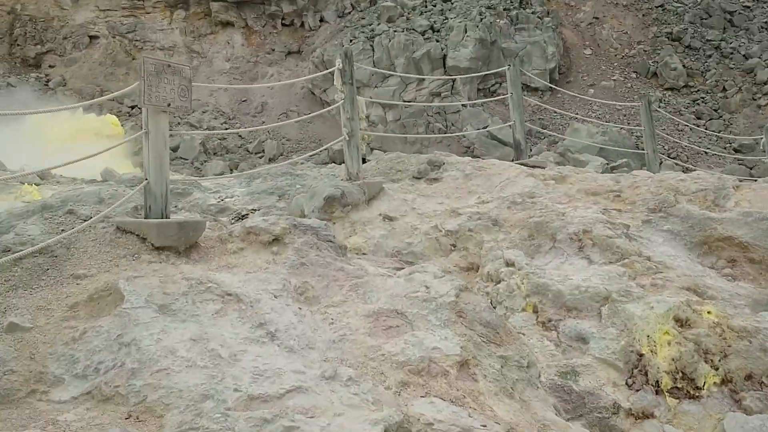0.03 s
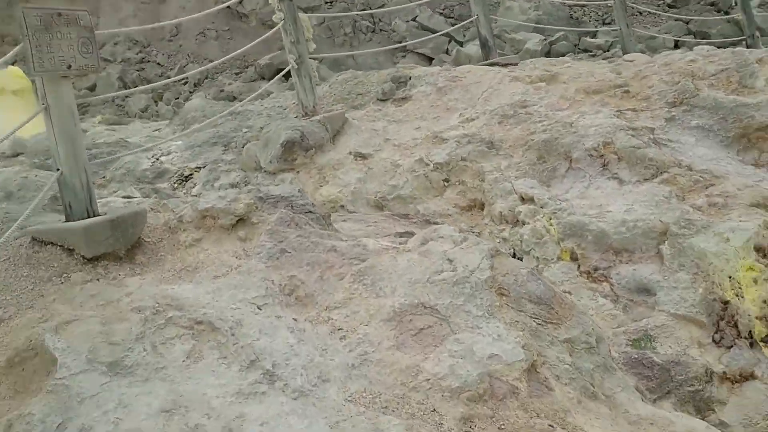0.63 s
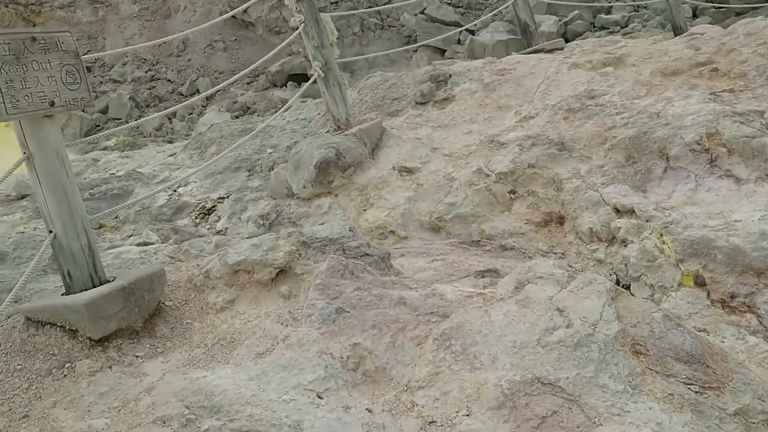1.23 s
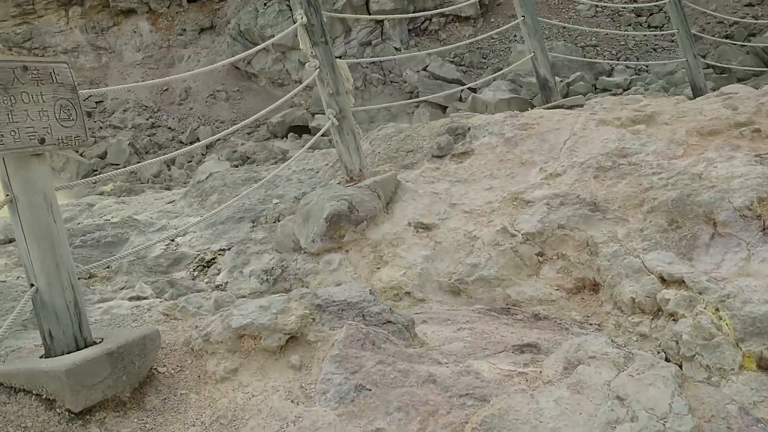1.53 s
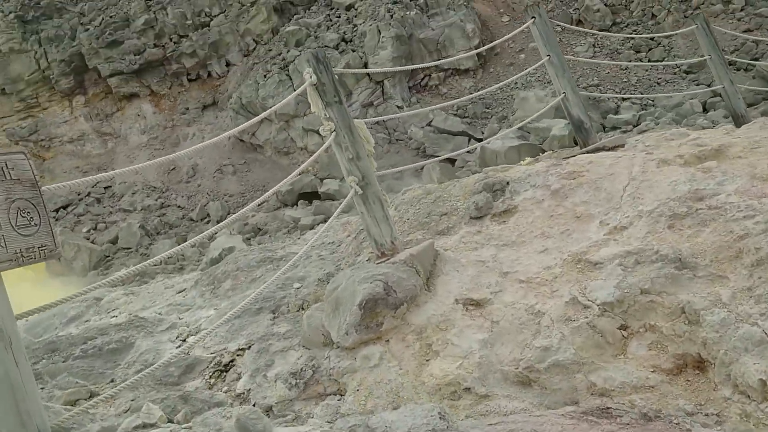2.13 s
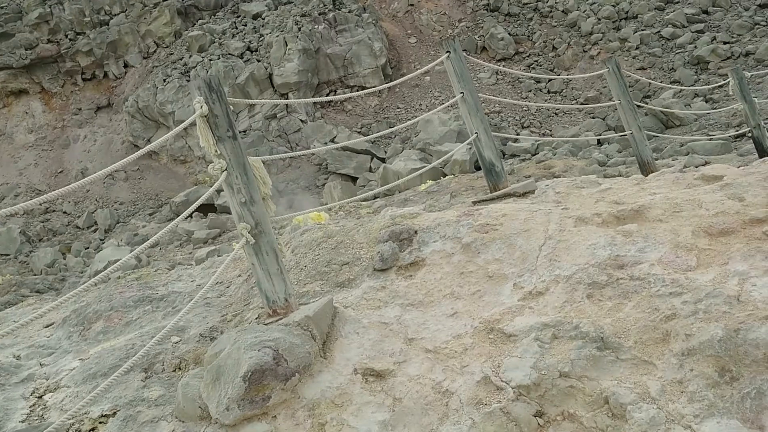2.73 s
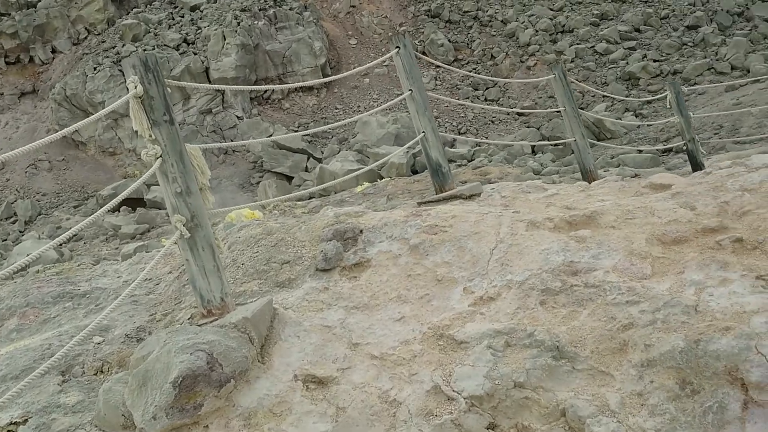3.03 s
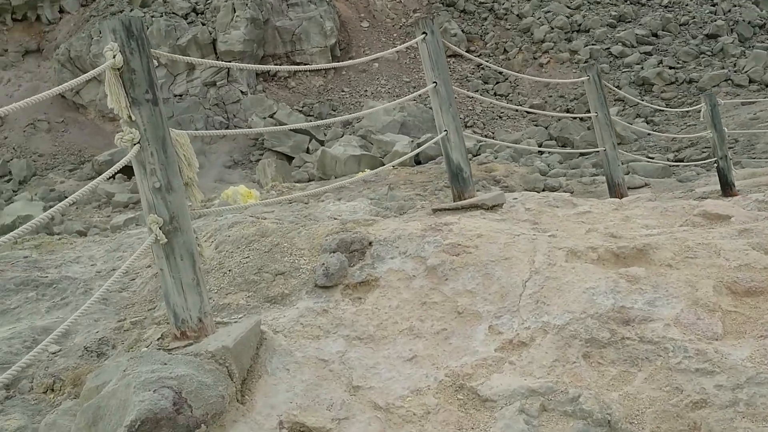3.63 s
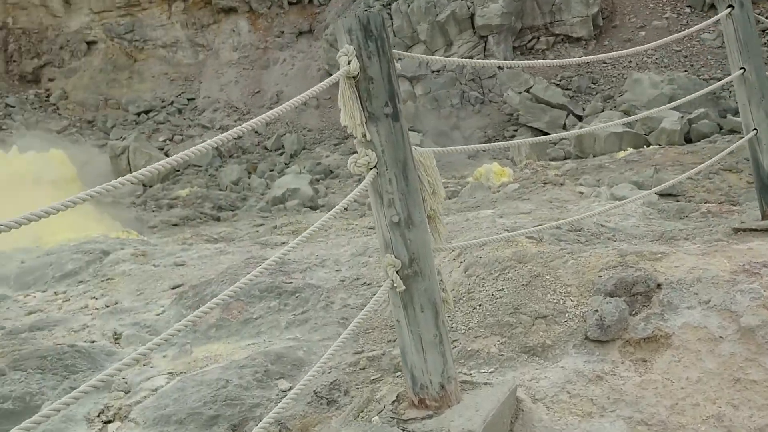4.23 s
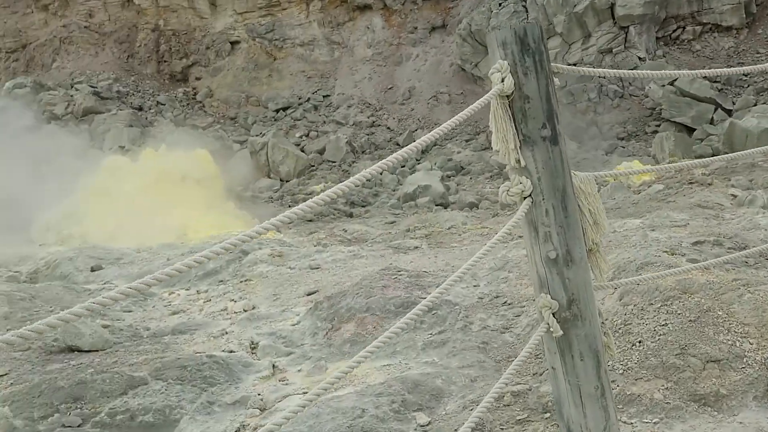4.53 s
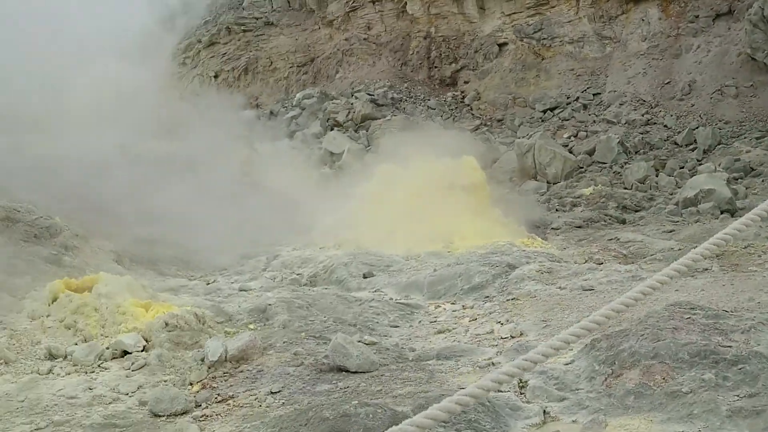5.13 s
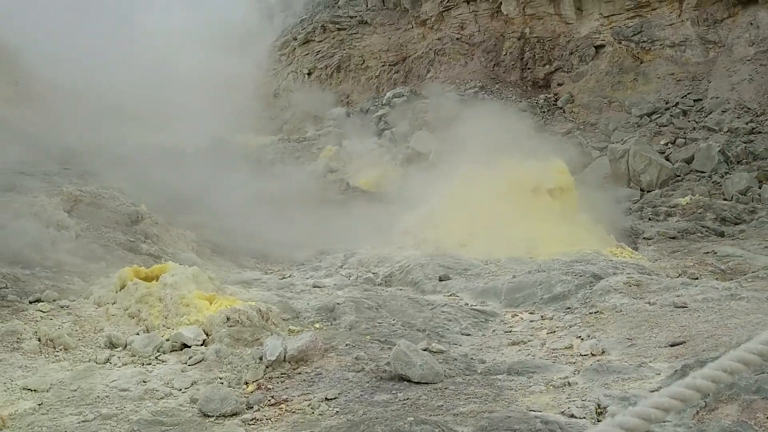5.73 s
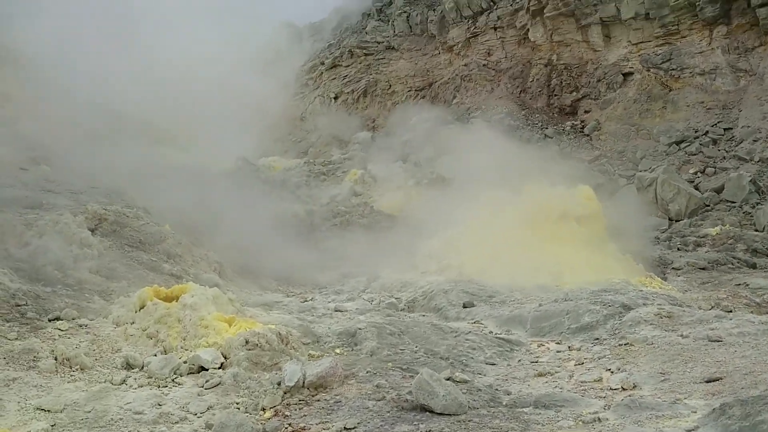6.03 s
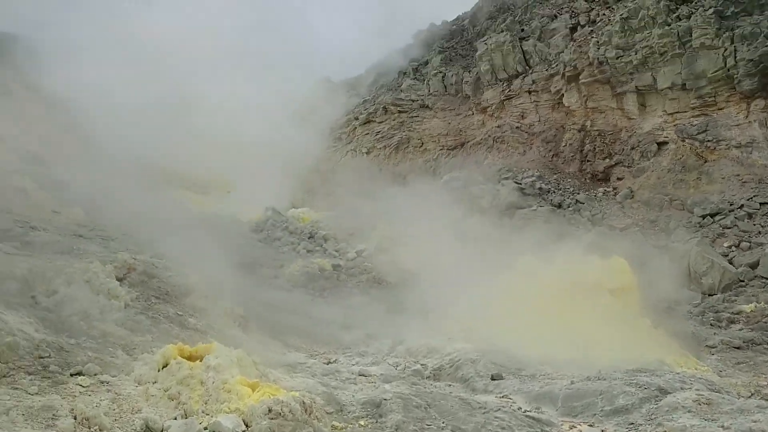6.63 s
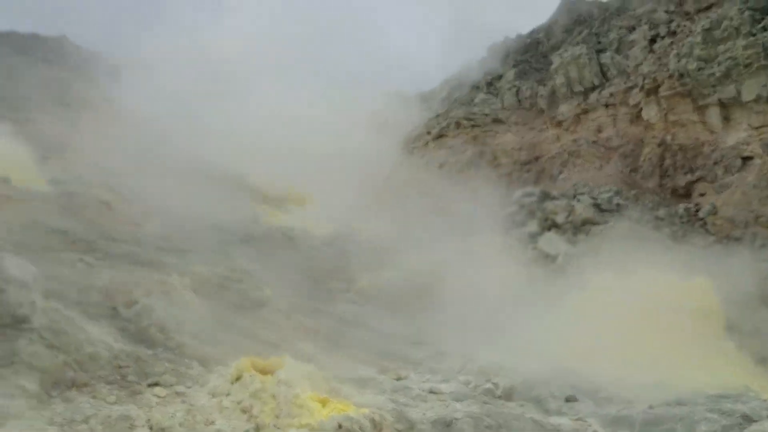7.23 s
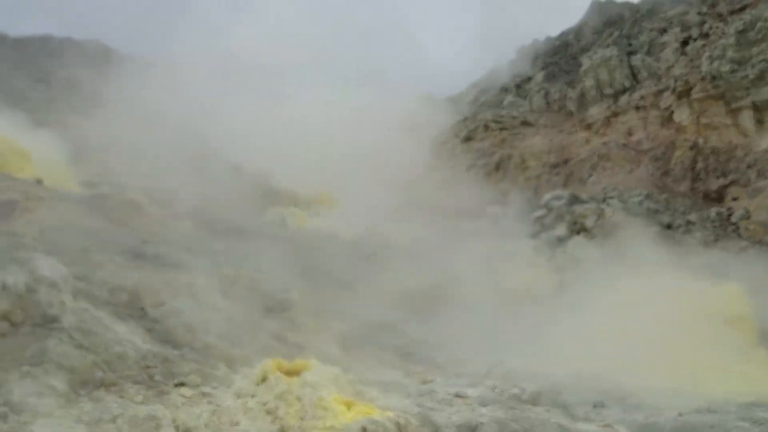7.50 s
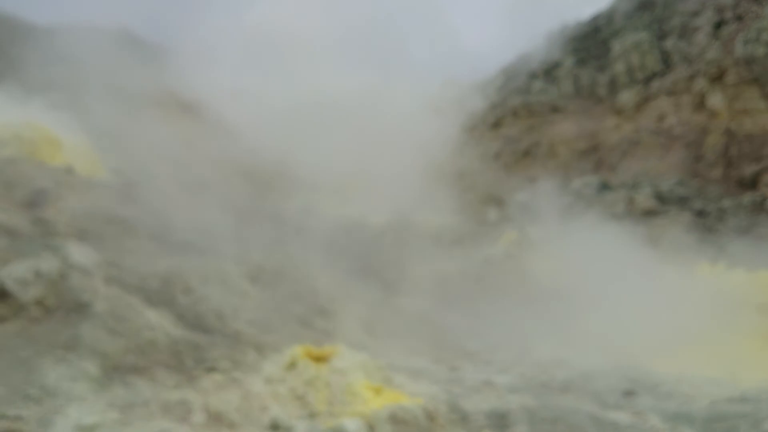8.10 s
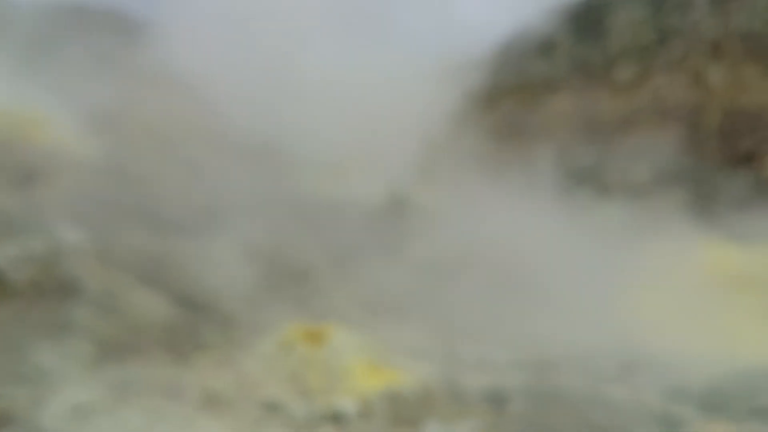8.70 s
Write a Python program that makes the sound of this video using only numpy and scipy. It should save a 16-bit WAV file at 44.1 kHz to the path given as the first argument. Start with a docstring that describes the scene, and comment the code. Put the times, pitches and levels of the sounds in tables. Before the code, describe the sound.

Outdoors on a rocky slope, strong gusts thud and crackle against the right side of a moving microphone, with duller bumps on the left. Underneath, steam vents keep up a quieter, steady hiss and low roar. Someone walks unevenly over grit, with short scrapes, light knocks and sharp stone clicks. After about seven seconds the wind drops, leaving the steam, a soft sputtering on the right and a few small ticks.

```python
"""A windy walk to steam vents

Steam vents on rocky volcanic ground roar low and hiss from several sides. Shoes scuff the grit,
knock on the crust and click small stones together, among other small sharp ticks. Gusts hit the right
microphone opening (port) and break into rough, crackling blasts; the sheltered left port takes dull
bumps. The hardest gusts make the recorder's gain control turn everything down for a moment."""
import sys
import numpy as np
from scipy import signal
from scipy.fft import rfft, irfft, next_fast_len
from scipy.io import wavfile
from scipy.ndimage import uniform_filter1d, map_coordinates

SR = 44100
rng = np.random.default_rng(int(sys.argv[2]) if len(sys.argv) > 2 else 0)


def pcm_store(signal):
    """Save signal as 16-bit PCM."""
    levels = np.round(np.clip(np.atleast_2d(signal), -1, 1) * 32767)
    wavfile.write(sys.argv[1], SR, levels.astype(np.int16).T)


N = 386316

# how loud the vents are along the walk: (time [s], roar [dB], left hiss [dB], right hiss [dB])
VENT_LEVELS = [(0, -47.5, -58.5, -55.5), (0.3, -42.5, -51, -47.5), (0.75, -45, -54, -42),
               (1.1, -45.5, -56, -44), (1.6, -47, -55, -54.5), (2.3, -48, -54, -54), (2.8, -47, -54, -55),
               (3.3, -48.5, -51, -50.5), (3.7, -47.5, -53.5, -53.5), (4.3, -47, -52.5, -54),
               (4.7, -46.5, -51.5, -48.5), (5.2, -47.5, -53, -50), (5.9, -44, -49.5, -51.5),
               (6.6, -44.5, -51.5, -46.5), (7, -44, -52, -49), (7.4, -43.5, -50, -47.5),
               (8.75, -43, -51, -49.5)]
# the tone of tiny ticks of grit or droplets: (frequency [Hz], level [dB])
TICK_SPECTRUM = [(300, -37), (800, 0), (1300, -1.5), (2100, -2.5), (3000, -3), (4500, -12.5), (7000, -13.5),
                 (11000, -12.5), (16000, -20)]
# the tone of rough air at a port: (frequency [Hz], level [dB])
RASP_SPECTRUM = [(150, -20), (450, 4.5), (700, 4.5), (1100, 0), (1900, -3.5), (3000, -11.5), (4200, -21),
                 (6000, -27), (10000, -23), (16000, -32)]


def amp(db):
    """Turn decibels into a factor to multiply by."""
    return 10 ** (np.asarray(db) / 20)


def unit(x):
    """Scale a signal to an average (rms) size of 1."""
    return x / np.sqrt(np.mean(x ** 2) + 1e-20)


def along(points, hz):
    """Read between (frequency, value) points on a logarithmic frequency scale."""
    frequencies, values = np.transpose(points)
    return np.interp(np.log(hz + 1), np.log(frequencies + 1), values)


def curves(rows):
    """Turn each column after the time into one value per sample."""
    times, *columns = np.transpose(rows)
    return [np.interp(np.arange(N) / SR, times, column) for column in columns]


def wobble(rate):
    """A smooth curve through `rate` random points a second."""
    knots = rng.standard_normal(4096)
    return map_coordinates(knots, [np.arange(N) * rate / SR], mode="wrap")


def filtered(x, response):
    """Multiply each frequency in x by response(hz)."""
    size = next_fast_len(N + SR // 2)
    return irfft(rfft(x, size) * response(np.fft.rfftfreq(size, 1 / SR)), size)[..., :N]


def coloured(x, spectrum):
    """Shape the tone of x with a spectrum, then scale it to size 1."""
    return unit(filtered(x, lambda hz: amp(along(spectrum, hz))))


def noise(spectrum):
    """Smooth noise with the given spectrum."""
    return coloured(rng.standard_normal(N), spectrum)


def grainy(spectrum, grain_db, rate):
    """Noise that comes in tiny spurts of random size."""
    return coloured(rng.standard_normal(N) * amp(grain_db * wobble(rate)), spectrum)


def grains(spectrum, rate, spread_db):
    """Separate tiny ticks, about `rate` a second, a few larger than the rest."""
    hits = rng.random(N) < rate / SR
    size = amp(spread_db * np.minimum(rng.exponential(size=N), 4))
    return coloured(hits * size * rng.choice([-1, 1], N), spectrum)


def steady(x, span):
    """Even out changes in loudness that last longer than `span` seconds."""
    width = max(int(span * SR), 2)
    power = uniform_filter1d(uniform_filter1d(np.abs(signal.hilbert(x)) ** 2, width), width)
    return unit(x / np.sqrt(np.abs(power) + 1e-4))


def swells(times, halves, levels_db, fall=1.3):
    """A loudness curve of short swells that rise faster than they fall."""
    power = np.zeros(N)
    for at, half, db in zip(times, halves, levels_db):
        i = np.arange(max(int((at - 5 * half) * SR), 0), min(int((at + 5 * half) * SR), N))
        offset = (i / SR - at) / half + (fall - 1 / fall) / 2
        power[i] += amp(db) ** 2 * np.exp(-np.where(offset < 0, offset * fall, offset / fall) ** 2)
    return np.sqrt(power)


def sides(pan_db):
    """Left and right gains that make the left louder by pan_db."""
    return amp([[pan_db / 2], [-pan_db / 2]])


def patchy(x, depth_db, width_hz=260, life_s=0.09):
    """Churning air lets narrow bands of a hiss swell and fade on their own."""
    spectra = signal.stft(x, nperseg=512)[2]
    bins = max(round(width_hz * 512 / SR), 1)
    frames = max(round(life_s * SR / 256), 1)
    patches = uniform_filter1d(rng.standard_normal(spectra.shape), bins, axis=0)
    patches = uniform_filter1d(patches, frames, axis=1)
    return unit(signal.istft(spectra * amp(depth_db * unit(patches)), nperseg=512)[1][:N])


def vent_roar():
    """The vents roar low, and the deep part sounds nearly the same at both ports."""
    # the tone of the roar: (frequency [Hz], level [dB])
    spectrum = [(20, -14), (45, 11.5), (75, 3), (110, 1.5), (160, 1), (280, -1.5), (450, -4.5), (620, -10),
                (900, -18), (1500, -26.5), (3500, -70)]
    # how alike the two ports hear it: (frequency [Hz], likeness [0 to 1])
    likeness = [(40, 0.82), (120, 0.94), (250, 0.92), (480, 0.68), (1000, 0.11)]
    roar_db, _, _ = curves(VENT_LEVELS)
    spread = lambda hz: np.arccos(np.clip(along(likeness, hz), -1, 1)) / 2
    mid = filtered(noise(spectrum), lambda hz: np.cos(spread(hz)))
    side = filtered(noise(spectrum), lambda hz: np.sin(spread(hz)))
    return np.array([mid + side, mid - side]) * amp(roar_db + 6.5 + 0.21 * wobble(14))


def vent_hiss():
    """Steam hisses unevenly on each side; on the right, wet steam also spits droplets."""
    # the tone of the hiss on each side: (frequency [Hz], level [dB])
    left_spectrum = [(250, -16), (800, 2), (1300, -1), (2000, 1), (2800, -3.5), (3700, 0), (5200, -4.5),
                     (7500, -10.5), (11000, -7.5), (16000, -10)]
    right_spectrum = [(250, -9.5), (800, -2), (1450, -4.5), (2400, -2.5), (3300, -0.5), (3750, -9),
                      (5200, -20), (7500, -11.5), (11000, -14.5), (16000, -20)]
    _, left_db, right_db = curves(VENT_LEVELS)
    left = patchy(grainy(left_spectrum, grain_db=0.9, rate=710), depth_db=1.6)
    left *= amp(left_db + 1.2 + wobble(12))
    right = patchy(grainy(right_spectrum, grain_db=0.2, rate=480), depth_db=3.0)
    right *= amp(right_db - 0.16 + 0.93 * wobble(13))
    spits = grains(TICK_SPECTRUM, rate=60, spread_db=7) * amp(right_db - 11)
    return left, right + spits


def thin_jet():
    """A thin jet of steam makes a band of hiss that drifts up and down in pitch."""
    # the jet, by turns in the open and screened: (time [s], level [dB])
    levels = [(0, -77), (0.12, -42.5), (0.3, -46.5), (0.47, -53), (0.74, -42.5), (1.1, -43), (1.42, -49.5),
              (1.72, -49), (1.9, -48), (2.08, -44), (2.35, -55), (2.6, -48.5), (2.95, -49), (3.13, -62.5),
              (3.45, -49.5), (3.7, -54.5), (3.87, -70), (4.0, -60), (4.15, -51), (4.4, -48.5), (4.9, -49.5),
              (5.03, -58), (5.35, -61), (5.8, -57), (6.5, -59.5), (7, -69), (8.75, -55.5)]
    # the centre of its hiss: (time [s], frequency [Hz])
    centres = [(0, 4200), (0.2, 4500), (0.31, 4950), (0.45, 3900), (0.72, 4400), (1.1, 3850), (1.45, 4000),
               (1.75, 3900), (2.1, 3700), (2.7, 4050), (3.0, 3900), (3.5, 4200), (3.7, 4700), (4.15, 3950),
               (4.5, 4250), (4.9, 4400), (6, 4200), (8.75, 5000)]
    # its tone around that centre: (frequency [times the centre], level [dB])
    spectrum = [(0.37, -45), (0.72, -10), (0.85, -1.5), (1.08, -1), (1.22, -10), (1.5, -13), (1.75, -15.5),
                (2.5, -14.5), (4, -27)]
    jet_db, = curves(levels)
    hz, t, spectra = signal.stft(rng.standard_normal(N), SR, nperseg=512)
    centre_hz = np.interp(t, *np.transpose(centres))
    spectra *= amp(along(spectrum, hz[:, None] / centre_hz))
    hiss = unit(signal.istft(spectra, nperseg=512)[1][:N])
    return hiss * amp(jet_db - 3.4 + 2.0 * wobble(23))


def near_vent():
    """The nearest vent rushes and sputters as it comes round the slope, late in the walk."""
    # how loud the rush is: (time [s], level [dB])
    levels = [(0, -82), (6.6, -72), (7.2, -52), (7.7, -50), (8.3, -49.5), (8.75, -49.5)]
    # its tone: (frequency [Hz], level [dB])
    spectrum = [(1200, -28), (1900, -5.5), (2500, -3), (3250, -5), (3700, -9), (5000, -37)]
    rush_db, = curves(levels)
    rush = patchy(grainy(spectrum, grain_db=2.0, rate=270), depth_db=1.5, width_hz=600, life_s=0.025)
    rush *= amp(rush_db - 0.5 + wobble(35))
    sputter = grains(spectrum, rate=45, spread_db=2) * amp(rush_db - 11)
    return rush + sputter


def sizzle():
    """A very high, thin sizzle comes and goes once."""
    # its one swell: (time [s], half length [s], level [dB])
    swell = (1.58, .09, -52)
    # its tone: (frequency [Hz], level [dB])
    spectrum = [(12000, -39), (14100, -9), (15000, 3), (15800, -11)]
    return noise(spectrum) * swells(*np.transpose([swell]))


def vents():
    """All the steam together; the hiss on the windy right side drops out briefly now and then."""
    # dips in the right hiss: (time [s], half length [s], depth [dB])
    dips = [(0.607, 0.021, 26), (0.908, 0.0074, 11), (1.056, 0.078, 15), (1.294, .02, 12),
            (1.835, 0.017, 6), (1.982, 0.015, 18), (2.2, 0.039, 9), (2.453, .022, 6)]
    roar = vent_roar()
    left, right = vent_hiss()
    right = right + thin_jet() + near_vent()
    dip_db = sum(depth * swells([at], [half], [0]) for at, half, depth in dips)
    return roar + np.array([left + sizzle(), right * amp(-dip_db)])


def gritty_rasps():
    """Tiny ticks and snaps over a low knock: shoe scrapes, and the bright crackle of gusts."""
    # brief gritty rasps: (time [s], half length [s], grit [dB], knock [dB], left minus right [dB])
    rasps = [(0.106, 0.033, -49, -52, -9), (0.282, 0.021, -51, -70, -14), (0.56, 0.016, -54, -62, -3),
             (0.694, 0.011, -41.5, -62, -11), (0.745, 0.008, -46, -64, -7), (1.177, 0.0048, -47.5, -35, -2),
             (1.677, 0.15, -51, -59, 1.5), (1.753, 0.003, -42, -28, -2), (1.767, 0.014, -43, -39, -4),
             (2.271, 0.0088, -51, -44, 4), (2.491, 0.012, -44, -51, 0), (2.517, 0.01, -41.5, -49, 6),
             (2.552, 0.0093, -42.5, -63, 4.5), (3.254, 0.038, -44, -54, -9), (3.746, 0.022, -48, -62, 3),
             (4.052, 0.0092, -39.5, -63, -0.5), (4.629, 0.0029, -42, -33, -2),
             (5.307, 0.031, -52.5, -46.5, 1), (5.574, 0.033, -49, -48.5, -9), (6.047, 0.024, -57, -55, 14),
             (6.148, 0.012, -46, -42, 1), (6.227, 0.014, -37.5, -27, 2), (6.318, 0.007, -42.5, -48, -9),
             (8.246, 0.014, -48, -66, 0)]
    # the tones of the low knock and of a snap: (frequency [Hz], level [dB])
    knock_spectrum = [(80, -19), (280, -3), (415, -3), (468, 11), (535, -18.5), (603, 8), (680, -7),
                      (900, -9), (1130, -5.5), (1800, -38)]
    snap_spectrum = [(600, -8), (2500, 4.5), (6000, -5), (11000, -4), (16000, -12)]
    times, halves, grit_db, knock_db, pan_db = np.transpose(rasps)
    knock = steady(noise(knock_spectrum), span=0.025) * swells(times, halves, knock_db)
    grit = []
    for side in (1, -1):  # left, then right
        ticks = grains(TICK_SPECTRUM, rate=1500, spread_db=4.5)
        snaps = amp(-4.5) * grains(snap_spectrum, rate=200, spread_db=4.0)
        grit.append((ticks + snaps) * swells(times, halves, grit_db + side * pan_db / 2))
    return knock + np.array(grit)


def sand():
    """Fine sand sprays from under a sliding sole, on the right."""
    # sprays of sand: (time [s], half length [s], level [dB])
    sprays = [(0.094, 0.013, -42), (0.262, 0.006, -56), (0.307, 0.027, -59), (0.56, 0.012, -57)]
    # their tone: (frequency [Hz], level [dB])
    spectrum = [(3000, -30), (5500, -7), (8000, 1), (11000, -1), (16000, -4)]
    spray = grainy(spectrum, grain_db=7.5, rate=600) * swells(*np.transpose(sprays))
    return np.array([np.zeros(N), spray])


def squeaks(width_hz=260, slips_per_s=75):
    """The sole sticks and slips, stirring one narrow ringing tone in quick spurts."""
    # gritty squeals: (time [s], half length [s], level [dB], pitch [Hz])
    squeals = [(0.123, 0.034, -42, 2150), (1.185, 0.0044, -37, 1430), (1.253, 0.011, -42, 1590),
               (5.573, 0.078, -50.5, 1890), (6.222, 0.017, -39.5, 2800), (8.235, 0.014, -46, 3000)]
    out = np.zeros((2, N))
    spurts = unit(1.4 + np.cos(2 * np.pi * slips_per_s * np.arange(N) / SR + 2.2 * wobble(30)))
    for at, half, db, pitch in squeals:
        resonance = lambda hz: 1 / (1 + ((hz - pitch) / width_hz) ** 2)
        ring = filtered(rng.standard_normal((2, N)), resonance)
        out += unit(ring) * spurts * swells([at], [half], [db])
    return out


def dry_clicks(crack_fade_s=0.03, crack_db=-4.5, brightening=0.4, usual_db=-30):
    """Cracks with a very short ring: stones underfoot, and small sharp ticks mostly on the right."""
    # clicks and ticks: (time [s], peak [dB], pitch [ratio], left minus right [dB], length [ratio])
    clicks = [(0.513, -36, 1, -14, .4), (0.723, -37, 1.2, -12, .35), (1.167, -37, 1.2, 5, .6),
              (1.181, -34, 0.83, -4, 1), (1.221, -32, 1.03, -2, 1), (1.252, -26, 1.12, 4, 0.78),
              (1.55, -37, 1.1, -11, 0.78), (1.657, -29.5, 1.4, 6, 1), (1.704, -28, 1.4, 1, 1),
              (1.748, -19.5, 1.07, -7, 0.36), (2.255, -40, 0.8, 14, 1), (2.32, -35.5, 1.1, -10, 0.29),
              (2.485, -29, 1.76, 8, 0.5), (2.697, -38, 0.92, -15, 0.77), (3.54, -36.5, 0.75, -19, 1),
              (3.894, -37, 0.82, 4, 0.77), (3.969, -34, 0.69, 2, 0.36), (4.049, -23, 1.13, 9, 0.2),
              (4.628, -31, 0.64, -1, 0.46), (5.185, -33.5, 0.74, -12, 0.54), (5.326, -28, 1.03, 3, 0.94),
              (5.378, -33.5, 1.15, 0, 0.66), (5.392, -33, 0.61, -13, 0.54), (5.764, -16.5, 1.07, 1, 1),
              (6.528, -33.5, 0.85, -12, 0.57), (7.349, -34, 0.78, -8, 0.3), (7.373, -30, 0.91, -10, 0.45),
              (7.905, -34, 0.72, -11, 0.32), (7.93, -33.5, 0.79, -8, 0.23), (8.235, -47, 1, -2, .8),
              (8.459, -29.5, 0.58, -1, 0.33), (8.555, -36, 0.79, 3, 0.32)]
    # the tones a click rings with: (frequency [Hz], level [dB], time to fade by 60 dB [s])
    modes = [(983, 17, 0.017), (1190, 18.5, 0.008), (1560, 11, 0.014), (1777, 5, 0.027), (2810, 6.5, 0.03),
             (3010, 13, 0.012), (3770, -5.5, 0.011), (4980, -9, 0.0078)]
    out, t = np.zeros((2, N + SR)), np.arange(SR // 10) / SR
    hz, mode_db, fade_s = np.transpose(modes)[:, :, None]
    crack_band = signal.butter(3, [550, 3700], "bandpass", fs=SR)
    fade = lambda life_s: amp(-60 * t / life_s) * (1 - np.exp(-t / .0004))
    for at, db, ratio, pan_db, length in clicks:
        phase = rng.uniform(0, 2 * np.pi, hz.shape) + 0.26 * rng.standard_normal((2, len(hz), 1))
        tilt_db = brightening * (db - usual_db) * np.log2(hz / hz.mean())  # louder is brighter
        strength = amp(mode_db + tilt_db + rng.standard_normal(hz.shape))
        tones = np.sin(2 * np.pi * hz * ratio * t + phase)
        ring = (strength * fade(fade_s * length) * tones).sum(axis=1)
        crack = signal.lfilter(*crack_band, rng.standard_normal((2, len(t))))
        crack *= fade(crack_fade_s * length)
        click = unit(ring) + amp(crack_db) * unit(crack)
        start = round(at * SR)
        out[:, start:start + len(t)] += amp(db) * sides(pan_db) * click / np.abs(click).max()
    return out[:, :N]


def knocks():
    """Heels and loose blocks strike the hollow crust, which gives a short, low ring."""
    # blows: (time [s], peak [dB], pitch [Hz], left minus right [dB], time to fade by 60 dB [s])
    blows = [(2.682, -32, 313, -1, 0.14), (3.891, -24, 310, 1, 0.026), (6.149, -20.5, 438, -2, 0.014),
             (6.161, -20, 465, 1, 0.013), (6.332, -24.5, 394, -15, 0.013)]
    # the tones the crust rings with: (frequency [times the pitch], level [dB])
    modes = [(0.78, -12), (1, 7.5), (1.37, -6), (2.1, -16.5), (3.2, -16)]
    out, t = np.zeros((2, N + SR)), np.arange(SR // 4) / SR
    ratio, mode_db = np.transpose(modes)[:, :, None]
    for at, db, pitch, pan_db, fade_s in blows:
        strength_db = mode_db + 2.4 * rng.standard_normal(ratio.shape)
        ring = (amp(strength_db - 60 * t / fade_s) * np.sin(2 * np.pi * pitch * ratio * t)).sum(axis=0)
        start = round(at * SR)
        out[:, start:start + len(t)] += amp(db) * sides(pan_db) * ring / np.abs(ring).max()
    return out[:, :N]


def tings(pitch_hz=5930, octave_db=-2):
    """A pure high tone and its octave sound for a few milliseconds, on the right only."""
    # thin tings: (time [s], half length [s], level [dB])
    moments = [(0.623, 0.004, -44), (0.766, 0.0027, -29), (1.96, 0.003, -54), (4.0, 0.004, -57)]
    phase = 2 * np.pi * pitch_hz * np.arange(N) / SR
    tone = unit(np.sin(phase) + amp(octave_db) * np.sin(2 * phase))
    return np.array([np.zeros(N), tone * swells(*np.transpose(moments))])


def blowing(breeze_db, gusts, swing_db):
    """Wind strength at one port: a restless breeze with gusts on top."""
    breeze = amp(breeze_db + swing_db * wobble(9.3))
    return np.hypot(breeze, swells(*np.transpose(gusts), fall=1.15))


def wind():
    """Slow swings of air pressure rumble at each port separately; on the right their crests flutter."""
    # the breeze between gusts: (time [s], right level [dB], left level [dB])
    breeze = [(0, -15.5, -39), (0.2, -24.5, -20.5), (0.6, -11, -15), (0.8, -17, -31), (0.91, -24, -25),
              (1.03, -7.5, -31), (1.42, -17.5, -24), (1.9, -12.5, -27), (2.15, -13, -26),
              (2.66, -19.5, -34), (2.8, -15.5, -34), (2.9, -32, -38), (3.05, -35, -38), (3.5, -14, -30),
              (3.83, -29.5, -38), (3.98, -19.5, -37), (4.22, -23, -34.5), (4.55, -9.5, -33),
              (5.3, -22, -33), (5.62, -20, -34), (5.72, -29, -31), (5.85, -28, -29), (5.97, -15.5, -32),
              (6.15, -15.5, -35), (6.45, -18.5, -43), (6.85, -28, -44), (7.3, -30, -42), (8.75, -32.5, -59)]
    # gusts on the right, and swirls that curl round to the left: (time [s], half length [s], level [dB])
    gusts = [(0.104, 0.007, -3), (0.388, 0.022, 5), (0.527, 0.026, 0.5), (0.653, 0.019, 3),
             (0.772, 0.014, 9), (0.838, 0.016, 9.5), (0.989, 0.0063, 6), (1.242, 0.023, -1),
             (1.691, 0.027, -5), (1.782, 0.02, -0.5), (1.875, 0.024, 1.5), (1.986, 0.039, 2.5),
             (2.258, 0.016, -4), (2.411, 0.013, -0.5), (2.542, 0.036, -5), (3.033, 0.041, -9),
             (3.179, 0.047, -9), (3.404, 0.03, -2.5), (3.627, 0.0093, -8), (3.735, 0.036, -13),
             (3.944, 0.011, -4.5), (4.027, 0.027, -3), (4.346, 0.037, -11.5), (4.575, 0.0053, -8),
             (4.69, 0.018, -6.5), (4.778, 0.013, -7), (4.838, 0.026, -12), (5.102, 0.017, -5.5),
             (5.187, 0.011, -5), (5.267, 0.0087, -10), (5.326, 0.021, -8.5), (5.452, 0.017, -5.5),
             (6.051, 0.0063, -8), (6.13, 0.0076, -4), (6.245, 0.052, -5), (6.453, 0.022, -3),
             (6.569, 0.051, -6), (7.582, 0.05, -16)]
    swirls = [(1.32, 0.023, -18.5), (2.214, 0.074, -16.5), (2.491, 0.019, -14), (2.78, 0.056, -23),
              (3.124, 0.074, -20.5), (5.24, 0.015, -21.5), (5.524, 0.024, -24), (8.543, 0.049, -33)]
    # the tone of the rumble at each port: (frequency [Hz], level [dB])
    right_spectrum = [(5, -10.5), (12, 9), (20, 2.5), (32, -4), (48, -16), (90, -26.5), (160, -39.5),
                      (400, -50), (1200, -82.5)]
    left_spectrum = [(6, 0), (18, 0), (45, -2), (90, -6.5), (160, -22.5), (320, -28.5), (900, -67),
                     (3000, -100)]
    right_db, left_db = curves(breeze)
    right = steady(noise(right_spectrum), span=0.021) * blowing(right_db, gusts, swing_db=1.5)
    flutter = right * np.tanh(right) * grainy(RASP_SPECTRUM, grain_db=7.0, rate=69) * amp(-40)
    left = steady(noise(left_spectrum), span=0.038) * blowing(left_db, swirls, swing_db=-1.5)
    return np.array([left, right + flutter])


def bumps(damping=0.61):
    """Each bump of air on the sheltered port stirs one dull, low ring that dies quickly."""
    # bumps of air: (time [s], half length [s], level [dB], ring pitch [Hz])
    pushes = [(0.209, 0.017, -27, 148), (0.287, 0.02, -31.5, 130), (0.475, 0.046, -30, 132),
              (0.623, 0.0056, -19, 227), (0.675, 0.0068, -23, 215), (1.05, 0.046, -27, 164),
              (1.272, 0.061, -25.5, 106), (1.463, 0.003, -11, 185), (1.617, 0.042, -34, 126),
              (2.124, 0.002, -14, 180), (2.216, 0.0067, -22.5, 203), (2.236, 0.0043, -18, 200),
              (2.489, 0.016, -32, 150), (2.803, 0.018, -33, 121), (3.096, 0.0058, -24.5, 189),
              (3.113, 0.0085, -22.5, 178), (3.153, 0.018, -38, 172), (5.55, 0.02, -30, 120)]
    # their tone before the ring: (frequency [Hz], level [dB])
    spectrum = [(20, -8), (70, 4.5), (300, -3), (550, -15), (1100, -45)]
    out = np.zeros(N)
    for at, half, db, pitch in pushes:
        ring = lambda hz: amp(along(spectrum, hz)) / (1 - (hz / pitch) ** 2 + 1j * damping * hz / pitch)
        shape = swells([at], [half], [0])
        boom = filtered(rng.standard_normal(N), ring) * shape
        out += boom * amp(db + 4) * np.linalg.norm(shape) / np.linalg.norm(boom)
    return out


def suction(at, half, db):
    """The core of a swirl of air pulls the pressure down for a moment, between two gentle rises."""
    offset = (np.arange(N) / SR - at) / half
    return amp(db) * (offset ** 2 - 1) * np.exp(-np.minimum(offset ** 2 / 2, 50))


def pops(swirls, brief_s=0.0025, pop_db=3):
    """The briefest swirls burst with a single sharp pop."""
    rasp_tone = lambda hz: amp(along(RASP_SPECTRUM, hz))
    one_pop = filtered(signal.unit_impulse(N, SR // 10), rasp_tone)
    kicks = np.zeros(N)
    for at, half, _, rasp_db in swirls:
        briefness = np.exp(-(half / brief_s) ** 2 / 2)
        kicks[round(at * SR)] = amp(rasp_db + pop_db) * np.sqrt(half * SR) * briefness
    return filtered(kicks, rasp_tone) / np.linalg.norm(one_pop)


def blasts(core_db=3, wake_db=8, wake_half_s=0.0043, wake_lag_s=0.0066):
    """Strong swirls of air thud, pop and crackle on the right port; the left takes only dull bumps."""
    # swirls that break on the right port: (time [s], half length [s], thud [dB], rasp [dB])
    swirls = [(0.083, 0.0037, -30.5, -49), (0.11, 0.0039, -19.5, -26.5), (0.352, 0.0017, -19.5, -30),
              (0.372, 0.019, -17, -24), (0.557, 0.017, -21.5, -29), (0.619, 0.0022, -12.5, -36),
              (0.633, 0.014, -32, -35.5), (0.757, 0.002, -10, -20), (0.771, 0.0029, 0.5, -16),
              (0.824, 0.0025, -18, -35), (0.834, 0.01, -15.5, -23.5), (0.96, 0.0021, -19, -28),
              (0.977, 0.0049, -10.5, -26), (0.983, 0.014, -23, -32.5), (1.775, 0.0022, -5.5, -23),
              (1.784, 0.0015, -5.5, -21), (1.793, 0.014, -29, -28), (1.842, 0.0015, -21, -36),
              (1.94, 0.0014, -28, -34), (1.958, 0.0019, -23, -34), (2.02, 0.0014, -13, -27.5),
              (2.145, 0.017, -31.5, -40), (3.237, 0.0055, -20, -31.5), (3.24, 0.03, -34, -38.5),
              (3.381, 0.024, -30.5, -39.5), (4.434, 0.0011, -26.5, -39), (4.577, 0.0089, -55, -40.5),
              (4.91, 0.0014, -29.5, -37), (4.962, 0.0087, -52, -39.5), (4.979, 0.001, -29, -30),
              (5.581, 0.0021, -17.5, -32), (5.6, 0.0035, -27, -35.5), (6.15, 0.0023, -24.5, -39),
              (6.166, 0.0039, -40, -34.5), (6.321, 0.026, -42, -37), (6.332, 0.0017, -10.5, -27.5),
              (6.357, 0.00067, -37, -24), (6.586, 0.0027, -10, -34), (6.597, 0.019, -22, -28)]
    times, halves, thud_db, rasp_db = np.transpose(swirls)
    cores = sum(suction(at, half, db + core_db) for at, half, db in zip(times, halves, thud_db))
    # a deeper dip in pressure trails each swirl
    wakes = sum(suction(at + wake_lag_s, wake_half_s, db + wake_db) for at, db in zip(times, thud_db))
    # the tone of a thud: (frequency [Hz], level [dB])
    thud_spectrum = [(20, -27), (60, 1), (130, 4.5), (260, -1.5), (550, -15), (1400, -57), (4000, -93)]
    thud = steady(noise(thud_spectrum), span=0.0048) * swells(times, halves, thud_db - .5)
    crackle = grainy(RASP_SPECTRUM, grain_db=5.0, rate=450)
    crackle += amp(2.5) * grains(RASP_SPECTRUM, rate=500, spread_db=1.5)
    rasp = steady(crackle, span=0.0074) * swells(times, halves, rasp_db + 1.5, fall=1.4)
    return np.array([bumps(), cores + wakes + thud + rasp + pops(swirls)])


def gain_control(x, ceiling_db=-8, sense_s=0.025, recover_s=0.41):
    """When the louder port passes the ceiling, both are turned down at once and recover slowly."""
    power = uniform_filter1d(np.abs(signal.hilbert(x)) ** 2 / 2, int(sense_s * SR)).max(axis=0)
    over_db = np.maximum(10 * np.log10(np.abs(power) + 1e-12) - ceiling_db, 0)
    fading = np.exp(-np.arange(N) / SR / recover_s)
    cut_db = np.maximum.accumulate(over_db / fading) * fading
    return x * amp(-cut_db)


def scene():
    """Vents, footsteps, small ticks and wind in the open air."""
    return (vents() + gritty_rasps() + sand() + squeaks() + dry_clicks() + knocks()
            + wind() + blasts() + tings())


def record(dry):
    """The ports notch the treble, hard gusts turn it all down, peaks are rounded and the top is cut."""
    # treble notches of each port: (frequency [Hz], gain [dB])
    left_port = [(5600, 0), (6600, -4.5), (7400, 1), (8800, -12), (10200, -7.5)]
    right_port = [(5000, 0), (6300, -6.5), (7150, -20.5), (8000, -20), (8700, -16), (9600, -10),
                  (10600, -8)]
    peak_limit, top_hz = 0.92, 15830
    notched = filtered(dry, lambda hz: amp([along(left_port, hz), along(right_port, hz)]))
    ducked = gain_control(notched)
    rounded = ducked / (1 + np.abs(ducked / peak_limit) ** 6) ** (1 / 6)
    return filtered(rounded, lambda hz: hz < top_hz)


dry = scene()
out = record(dry)
pcm_store(out)
```